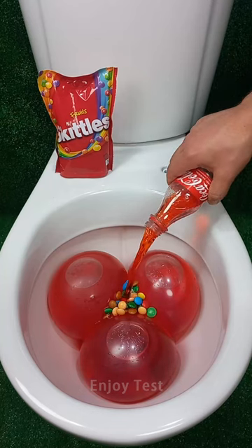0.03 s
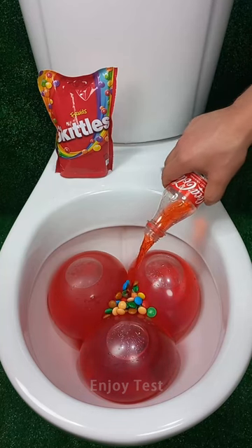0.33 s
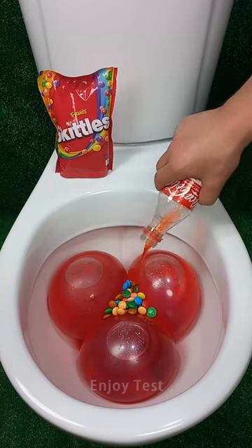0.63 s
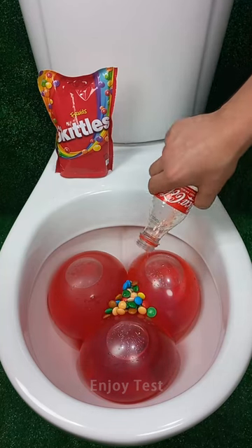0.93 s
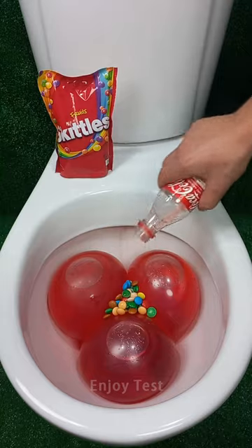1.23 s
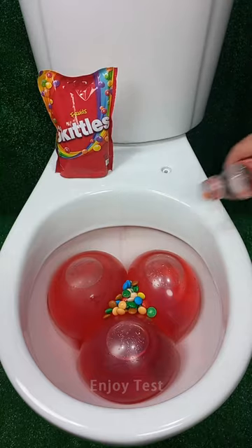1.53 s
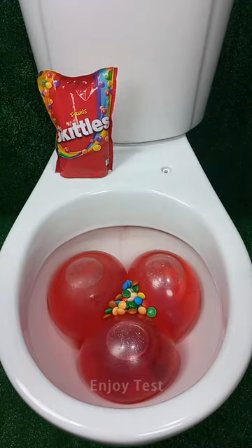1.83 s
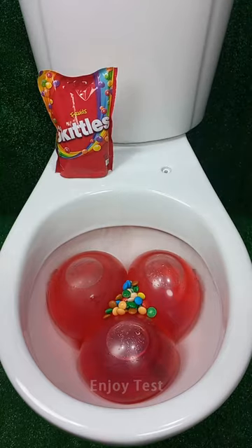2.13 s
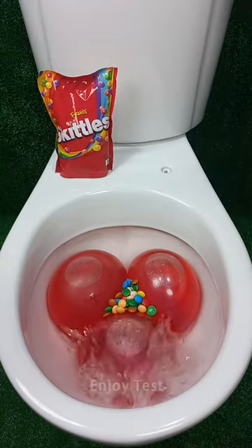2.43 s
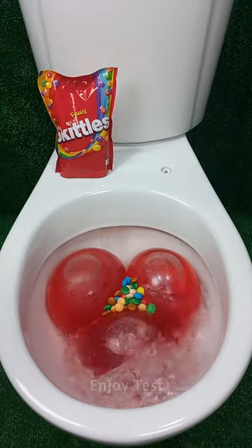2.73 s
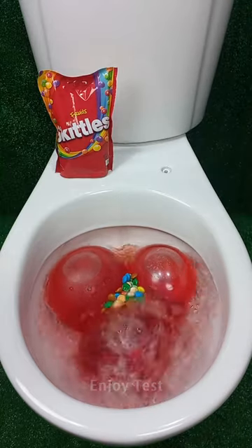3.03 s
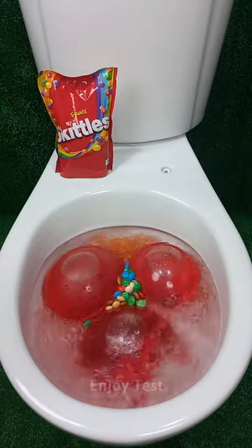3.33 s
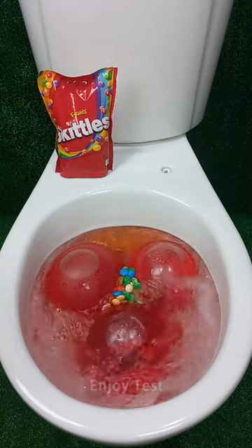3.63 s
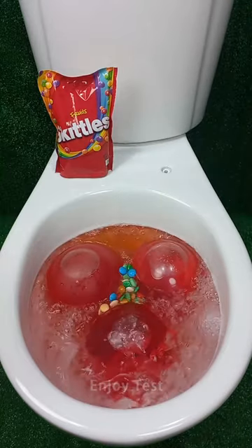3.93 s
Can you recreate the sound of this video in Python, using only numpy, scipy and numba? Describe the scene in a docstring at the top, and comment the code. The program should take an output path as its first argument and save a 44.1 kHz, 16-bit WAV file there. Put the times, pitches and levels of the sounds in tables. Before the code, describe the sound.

A toilet flushes in a small bathroom, heard close. First, foam hisses softly while the last of a fizzy drink glugs and drips into the bowl until about 0.9 seconds, and the fizz dies away. At 1.8 seconds the flush button clicks, and from 2 seconds water gurgles in over a low pipe rumble. Churning, splashing water peaks from about 2.7 to 3.2 seconds, easing slightly by 4 seconds.

```python
"""Foam hisses and dies away as the last of a fizzy drink glugs from a bottle into a toilet bowl.
The flush button clicks, the valve chatters, air gurgles out of the rim, then water rushes in with
spray and slaps over the rumble of the pipe. Most of the sound comes from bubbles: each is a damped
oscillator, its air the spring and the water around it the mass, so larger bubbles ring lower.
The porcelain bowl and a small bathroom scatter the sound of the water."""
import sys
import numpy as np
from scipy import signal
from scipy.fft import rfft, irfft
from scipy.io import wavfile
from scipy.ndimage import uniform_filter1d
from numba import njit

SR = 44100
rng = np.random.default_rng(int(sys.argv[2]) if len(sys.argv) > 2 else 0)


def unload_wav(signal):
    """Save mono or channel-first audio to the path in sys.argv[1] as 16-bit WAV at rate SR, clipped to [-1, 1]."""
    wavfile.write(
        sys.argv[1],
        SR,
        np.round(np.clip(np.atleast_2d(signal).T, -1, 1) * 32767).astype(np.int16),
    )


N = 176400
T = np.arange(N) / SR

# Levels are relative: each source adds its own gain.
# bursting foam (time [s], level [dB], offset of the coarser bubbles [dB])
FOAM_LEVELS = [(0.0, -39, -5.5), (0.782, -42.5, -10.5), (0.876, -43, -9), (1.016, -46, -11.5),
               (1.504, -53, -16.5), (1.674, -58.5, -14), (1.8, -62, -28)]
# spectrum of the foam (frequency [Hz], gain [dB])
FOAM_SPECTRUM = [(700, 0), (1100, -9.5), (1600, -8.5), (2200, -7.5), (3000, -1.5), (4000, 3), (6500, 2),
                 (9500, -2), (13000, 0.5), (15500, 0.5)]
# spectrum of the room's murmur (frequency [Hz], gain [dB])
MURMUR_SPECTRUM = [(25, -8), (50, -13), (85, 1), (130, -4.5), (300, -11), (1000, -21.5), (8000, -29)]
# glugs and last drops from the bottle (time [s], pitch [Hz], level [dB])
BOTTLE_GLUGS = [(.436, 560, -37.5), (.438, 1590, -36), (.783, 630, -38.5), (.834, 2200, -29),
                (.893, 2100, -23.5)]
# last trickles from the bottle (time [s], duration [s], pitch [Hz], level [dB])
BOTTLE_TRICKLES = [(0.394, 0.18, 582, -58.5), (0.78, .1, 720, -56), (0.83, 0.093, 2110, -50.5)]
# spectrum of running water (frequency [Hz], gain [dB])
WATER_SPECTRUM = [(200, -6.5), (330, -7), (420, 9), (600, -2.5), (850, -2.5), (1320, -2), (2200, -7),
                  (3200, -11), (5700, -17.5), (7500, -20), (9000, -22.5), (15500, -20.5)]
# knocks on the flush button and valve (time [s], level [dB])
BUTTON_KNOCKS = [(1.838, -52.5), (1.847, -43.5), (1.89, -48)]
# their modes (frequency [Hz], level [dB], time to decay by 60 dB [s])
BUTTON_MODES = [(489, 1, 0.18), (1290, -8, 0.098), (2140, -13, 0.11), (4230, -4.5, 0.043),
                (4400, -6, 0.035), (4850, 3.5, 0.027)]
# water forcing through the opening valve (time [s], level [dB])
VALVE_LEVELS = [(1.888, -51.5), (1.94, -35.5), (1.985, -26.5), (2.05, -38)]
# cavity resonances of the cistern (frequency [Hz], bandwidth [Hz], level [dB])
CISTERN_MODES = [(460, 51, -14), (700, 16, -12), (976, 54, -2), (1218, 34, -0.5), (2139, 23, -9)]
# single bubbles (time [s], pitch [Hz], level [dB], decay [cycles])
PLOP_BUBBLES = [(1.897, 977, -35, 62), (1.939, 986, -20, 18), (1.971, 1260, -19.5, 30),
                (1.987, 257.4, -19, 38), (2.043, 498, -14, 15), (2.05, 204, -20.5, 22),
                (2.089, 403, -15.5, 17), (2.115, 503, -13.5, 17), (2.156, 780, -11.5, 10),
                (2.178, 485, -14, 20), (2.193, 6570, -17, 37), (2.202, 510, -21, 31), (2.235, 800, -15, 8),
                (2.336, 543, -12, 2.9), (2.353, 1900, -20.5, 24), (2.405, 1430, -24, 16),
                (2.613, 1330, -16, 21), (2.644, 1480, -15.5, 17), (2.6642, 1115, -9.5, 15),
                (2.682, 4520, -18.5, 40), (2.843, 780, -17.5, 19), (2.875, 407, -20.5, 28),
                (3.125, 592, -16, 20.5), (3.285, 900, -17.5, 19), (3.292, 7160, -18.5, 41),
                (3.529, 1220, -15.5, 14), (3.557, 420, -22.5, 16), (3.589, 1810, -23, 23),
                (3.619, 494, -21.5, 8.8), (3.62, 1445, -17, 23), (3.727, 1670, -25, 50),
                (3.767, 1080, -21, 16), (3.887, 673, -22.5, 53), (3.912, 637, -24, 47)]
# spray in the bowl (time [s], level [dB])
SPRAY_LEVELS = [(1.91, -49.5), (2.0, -36), (2.08, -43.5), (2.275, -42), (2.29, -38.5), (2.9, -34),
                (3.25, -39), (3.35, -39.5), (3.78, -45.5), (4.0, -55.5)]
# air driven out of the rim (time [s], level [dB])
GURGLE_LEVELS = [(1.93, -45.5), (1.995, -24), (2.08, -26), (2.1, -22.5), (2.27, -34.5)]
# spectrum of that gurgle (frequency [Hz], gain [dB])
GURGLE_SPECTRUM = [(200, 17.5), (330, 4.5), (500, 0), (620, -3), (750, 2.5), (1200, -1), (1550, -6.5),
                   (2200, -8), (3200, -8)]
# long glug as the rim fills (time [s], level [dB])
RIM_GLUG_LEVELS = [(2.07, -48), (2.105, -30), (2.2, -33), (2.275, -43)]
# deep gulps under the jet (time [s], level [dB])
GULP_LEVELS = [(2.25, -45), (2.57, -60.5), (2.75, -52.5), (2.9, -40.5), (3.05, -36), (3.14, -42),
               (3.234, -59.5), (3.516, -47.5), (4.0, -64.5)]
# rumble of the pipe (time [s], level [dB])
PIPE_LEVELS = [(1.96, -85), (2.08, -40), (2.236, -57.5), (2.36, -36.5), (2.64, -67), (2.73, -45),
               (2.85, -70), (2.986, -52), (3.358, -74)]
# spectrum of that rumble (frequency [Hz], gain [dB])
PIPE_SPECTRUM = [(25, -24), (48, -15), (68, 3.5), (82, -9), (97, 5.5), (140, -9), (200, 0)]
# water slapping the porcelain (time [s], level [dB], centre [Hz], width [octaves])
WATER_SLAPS = [(2.044, -21, 5900, 2.2), (2.18, -24.5, 3850, 1.5), (2.2846, -23.5, 5340, 5.9),
               (2.399, -21.5, 5800, 1.3), (2.5538, -30.5, 7500, 2), (2.628, -25.5, 6600, 2.4),
               (2.642, -31.5, 5000, 2.3), (2.8687, -26, 3940, 1.7), (2.889, -16.5, 2600, 0.57),
               (3.054, -20.5, 2900, 0.75), (3.126, -14, 2570, 1.2), (3.15, -20, 2400, 1.8),
               (3.285, -25, 3970, 1.1), (3.507, -25, 10300, 2.3), (3.581, -24, 11000, 1.7),
               (3.659, -32, 3450, 0.74), (3.694, -29.5, 2700, 1.7), (3.73, -26, 4070, .6)]
# large churning bubbles (time [s], level [dB])
CHURN_LEVELS = [(2.28, -39.5), (2.556, -40.5), (2.73, -28), (3.15, -34), (3.21, -34), (3.57, -34),
                (3.836, -42.5), (3.894, -34), (4.0, -45)]
# their pitch, which falls when the jet digs deeper (time [s], pitch [Hz])
CHURN_PITCHES = [(2.33, 490), (2.65, 1020), (2.75, 597), (3.15, 630), (3.3, 488), (4.0, 596)]
# small splashing bubbles (time [s], level [dB])
SPLASH_LEVELS = [(2.28, -65), (2.288, -37), (2.662, -30.5), (3.18, -31), (3.204, -34), (3.87, -41.5),
                 (4.0, -53)]
# cavity resonances of the bowl (frequency [Hz], bandwidth [Hz], gain [dB])
BOWL_MODES = [(223, 11, 6), (292, 10, -0.5), (408.4, 21, 4.5), (525.4, 18, 5.5), (650, 72, -3),
              (728, 240, 4.5), (1210, 44, -1.5)]
# left-right difference of the scattered sound (frequency [Hz], gain [dB])
SIDE_SPECTRUM = [(100, -23), (250, -6.5), (500, -2.5), (1200, -2), (3000, 1), (15000, 1.5)]

BOWL_T60_S, BOWL_DB, ROOM_T60_S, ROOM_DB = 0.038, -1.5, 0.14, -3
LEFT_RIGHT = np.array([[1], [-1]])


def undb(db):
    """Amplitude grows tenfold with every 20 dB."""
    return 10 ** (np.asarray(db) / 20)


def unit(x):
    """Normalisation to rms 1."""
    return x / np.sqrt(np.mean(x ** 2) + 1e-18)


def steady(x):
    """Division by the running rms evens out slow changes of level."""
    power = uniform_filter1d(uniform_filter1d(x ** 2, SR // 8), SR // 16)
    return x / np.sqrt(np.abs(power) + 1e-18)


def envelope(rows, fade_db_per_s=500):
    """Gain along (time [s], level [dB]) rows, with exponential fades outside them."""
    t, db = np.array(rows).T[:2]
    outside_s = np.maximum(0, np.maximum(t[0] - T, T - t[-1]))
    return undb(np.interp(T, t, db) - fade_db_per_s * outside_s)


def colour(x, spectrum):
    """Zero-phase filtering by (frequency [Hz], gain [dB]) rows."""
    hz, db = np.array(spectrum).T
    f = np.fft.rfftfreq(x.shape[-1], 1 / SR) + 1
    return irfft(rfft(x) * undb(np.interp(np.log(f), np.log(hz), db)), x.shape[-1])


def band(x, lo_hz, hi_hz, order=3):
    """Maximally flat band-pass filtering."""
    edges_hz = [lo_hz, min(hi_hz, SR / 2 - 1000)]
    return signal.sosfilt(signal.butter(order, edges_hz, "band", fs=SR, output="sos"), x + 1e-18)


def flutter(lo_hz, hi_hz, order=3):
    """Band-limited noise of rms 1, for random amplitude modulation."""
    return unit(band(rng.standard_normal(N), lo_hz, hi_hz, order))


@njit
def damped_sines(times, hz, cycles, amplitude, glide, attack_cycles):
    """Damped oscillation: each sine falls 60 dB over `cycles` while rising by the fraction `glide`."""
    out = np.zeros(N)
    for k in range(len(times)):
        start, n = int(times[k] * SR), int(cycles[k] * SR / hz[k]) + 2
        turns, attack = 0., attack_cycles[k]
        gain, decay = amplitude[k], np.exp(-np.log(1000) / n)
        for i in range(max(0, min(n + int(attack * SR / hz[k]), N - start))):
            turns += hz[k] * (1 + glide * i / n) / SR
            if turns > attack / 2:
                gain *= decay
            rise = np.sin(np.pi / 2 * turns / attack) ** 2 if turns < attack else 1.
            out[start + i] += gain * rise * np.sin(2 * np.pi * turns)
    return out


def ring(times, hz, cycles, amplitude, glide):
    """Free vibration of bubbles or modes: short rings build within a cycle, long ones more slowly."""
    cycles = cycles * np.ones(len(hz))
    attack_cycles = np.maximum(0.74, .06 * cycles)
    return damped_sines(times, hz, cycles, amplitude, float(glide), attack_cycles)


def bubbles(lo_hz, hi_hz, per_s, cycles, spread_db, glide, spectrum=WATER_SPECTRUM):
    """Superposition of randomly timed resonances gives a steady swarm of rms 1."""
    when, pitch, length, strength = rng.random((int(per_s * N / SR), 4)).T
    hz = lo_hz * (min(hi_hz, SR / 2 - 2000) / lo_hz) ** pitch
    amplitude = hz * undb(-spread_db * np.log(1 - .985 * strength))  # many weak, a few strong
    swarm = ring(when * N / SR, hz, cycles * 2 ** (2 * length - 1), amplitude, glide)
    return steady(colour(band(swarm, lo_hz, hi_hz, order=2), spectrum))


def bowl(x):
    """Cavity resonance: the bowl lifts some narrow bands and weakens others."""
    return x + sum((undb(db) - 1) * signal.lfilter(*signal.iirpeak(hz, hz / width, SR), x)
                   for hz, width, db in BOWL_MODES)


def bathroom(x, scatter_db=0):
    """Reverberation: direct sound from one spot, quick bowl reflections and the room's tail, in stereo."""
    t = T[:SR // 3]
    bowl_tail, room_tail = (
        rng.standard_normal((2, len(t))) * undb(db - 60 * t / t60) * np.sqrt(2 * np.log(1000) / (t60 * SR))
        for t60, db in ((BOWL_T60_S, BOWL_DB), (ROOM_T60_S, ROOM_DB)))
    mid, side = undb(scatter_db) * (bowl_tail + room_tail)
    impulse = np.eye(1, len(t), k=16)[0]
    mid = mid + colour(impulse, [(300, 4), (1500, 1), (5000, -2), (12000, -3)])
    paths = mid + colour(side, SIDE_SPECTRUM) * LEFT_RIGHT
    smooth_gain = np.sqrt(uniform_filter1d(np.abs(rfft(mid)) ** 2, len(t) // 200))
    paths = irfft(rfft(paths) / smooth_gain, len(t))  # flat overall, with fine ripple
    return signal.fftconvolve(x[None], paths[:, :len(t) * 3 // 4], axes=1)[:, :N]


def foam(fine_db=1.0, coarse_db=2, right_db=1.0):
    """Countless tiny bursting bubbles add incoherently to a hiss; the coarser ones run out first."""
    t, db, coarse_offset_db = np.array(FOAM_LEVELS).T
    fine = np.array([bubbles(3490, 16500, 9000, 6.0, 0.44, 0.065, FOAM_SPECTRUM) for _ in range(2)])
    coarse = np.array([bubbles(876, 3640, 3000, 5.2, 0.63, 0.13, FOAM_SPECTRUM) for _ in range(2)])
    fine *= undb(fine_db) * envelope(FOAM_LEVELS, fade_db_per_s=48)
    coarse *= undb(coarse_db) * envelope(np.c_[t, db + coarse_offset_db], fade_db_per_s=60)
    return np.sqrt(2) * (fine + coarse) * undb(-right_db / 2 * LEFT_RIGHT)


def murmur(level_db=-58, side_db=-6, fade_db_per_s=4):
    """Ambient noise of the room, mostly low in frequency, slowly grows fainter."""
    mid, side = unit(colour(rng.standard_normal((2, N)), MURMUR_SPECTRUM))
    return undb(level_db - fade_db_per_s * T) * (mid + undb(side_db) * side * LEFT_RIGHT)


def bottle(stream_db=-55, thin_db_per_s=12):
    """Air entrainment: the thinning stream burbles, air glugs into the neck and the last drops fall."""
    t, hz, db = np.array(BOTTLE_GLUGS).T.copy()
    glugs = ring(t, hz, cycles=30, amplitude=undb(db), glide=0.063)
    stream = bubbles(150, 1430, 500, 9.2, 2.7, 0.2, [(220, -7), (350, -3.5), (750, -11), (1100, -7)])
    return glugs + bowl(stream * undb(stream_db - thin_db_per_s * T))


def trickle(pitch_ratio=1.2):
    """The last spurts break into bubbles of like size, which resonate in a narrow band."""
    return sum(bubbles(hz / pitch_ratio, hz * pitch_ratio, per_s=450, cycles=9.9, spread_db=2, glide=.08)
               * envelope([(t, db), (t + length, db)]) for t, length, hz, db in BOTTLE_TRICKLES)


def button(rattle_depth=0.82):
    """Light impacts excite the modes of the button and valve, which rattle loosely."""
    hz, db, t60 = np.array(BUTTON_MODES).T.copy()
    knocks = sum(ring(np.full(len(hz), t), hz, hz * t60, undb(db + knock_db), glide=0)
                 for t, knock_db in BUTTON_KNOCKS)
    return knocks + rattle_depth * band(knocks, 3500, 5300) * flutter(50, 330)


def valve(rough_db=4):
    """Forced resonance: water chatters through the opening valve and drives the hollow cistern."""
    chatter = rng.standard_normal(N) * undb(rough_db * flutter(20, 99))
    cistern = sum(undb(db) * unit(signal.lfilter(*signal.iirpeak(hz, hz / width, SR), chatter))
                  for hz, width, db in CISTERN_MODES)
    return steady(band(cistern, 340, 1800)) * envelope(VALVE_LEVELS)


def plops():
    """Bubble resonance: single pockets of air ring and rise in pitch."""
    t, hz, db, cycles = np.array(PLOP_BUBBLES).T.copy()
    return band(ring(t, hz, cycles, undb(db), glide=0.053), 180, SR / 2)


def spray(drops_db=-7, mist_db=-3.0, ping_db=-9, flutter_db=1.1):
    """Droplet impacts patter on the porcelain in uneven spurts and ping in the water, over a fine mist."""
    spurts = undb(flutter_db * flutter(5.4, 63, order=1)) * envelope(SPRAY_LEVELS)
    drops = sum(bathroom(bubbles(3670, 15300, 700, 6.7, 2.5, 0.12) * spurts, scatter_db=-3)
                for _ in range(2))
    pings = bathroom(bubbles(2990, 7330, per_s=140, cycles=80, spread_db=3.7, glide=0.11) * spurts)
    mist = unit(colour(band(rng.standard_normal((2, N)), 2850, 19700), WATER_SPECTRUM))
    return undb(drops_db) * drops + undb(ping_db) * pings + undb(mist_db) * mist * spurts


def gurgle(air_db=-5, glug_db=-4, gulp_db=-2):
    """Displaced air rings as bubbles: the rim gurgles, glugs as it fills, and the jet gulps below."""
    air = bubbles(319.5, 2580, 900, 15.5, 1.74, 0.21, GURGLE_SPECTRUM) * envelope(GURGLE_LEVELS)
    glug = bubbles(349, 595, 260, 25, 1.2, 0.093) * envelope(RIM_GLUG_LEVELS)
    gulps = bubbles(195.4, 362, 450, 12, 2, 0.072) * envelope(GULP_LEVELS)
    return bowl(undb(air_db) * air + undb(glug_db) * glug + undb(gulp_db) * gulps)


def pipe(rumble_db=-3):
    """Structure-borne sound: the falling water shakes the pipe and the bowl."""
    return bubbles(58.0, 155, 150, 13, 1.5, .03, PIPE_SPECTRUM) * envelope(PIPE_LEVELS) * undb(rumble_db)


def slaps(grain_db=5, attack_s=0.00073, decay_s=0.0031):
    """Impact noise: each slap on the porcelain is a short crackling burst of droplets."""
    out, t = np.zeros(N + SR), T[:SR // 10]
    f = np.fft.rfftfreq(len(t), 1 / SR) + 1
    burst = np.minimum(t / attack_s, 1) * np.exp(-t / decay_s)
    for start, db, hz, octaves in WATER_SLAPS:
        noise, size = rng.standard_normal((2, len(t)))
        rolloff = (1 + (np.log2(f / hz) / octaves * 2) ** 2) ** 0.86
        drops = irfft(rfft(noise * undb(grain_db * size)) / rolloff, len(t))
        i = int(start * SR)
        out[i:i + len(t)] += undb(db) * unit(drops) * burst
    return band(out[:N], 900, 18000, order=2)


def churning(per_s=220, cycles=17, octaves=0.628, spread_db=6):
    """Large bubbles resonate at a pitch set by their size, which follows the depth of the jet."""
    when, pitch, length, strength = rng.random((int(per_s * N / SR), 4)).T
    t = when * N / SR
    hz = np.interp(t, *np.array(CHURN_PITCHES).T) * 2 ** (octaves * (2 * pitch - 1))
    swarm = ring(t, hz, cycles * 2 ** (2 * length - 1), undb(spread_db * strength), glide=0.093)
    return steady(band(swarm, 324, 1620)) * envelope(CHURN_LEVELS)


def rush(churn_db=-3, splash_db=-4, drip_db=-7, slosh_db=0.7):
    """Inrushing water entrains air at several spots; sloshing modulates the churn and the splash."""
    slosh = undb(slosh_db * flutter(7.1, 17.5, order=2))
    splashing = envelope(SPLASH_LEVELS)
    churn = sum(bathroom(bowl(churning() * slosh)) for _ in range(2)) / np.sqrt(2)
    splash = sum(bathroom(bubbles(805, 3870, 600, 6.8, 4.6, 0.2) * splashing * slosh, scatter_db=-0.5)
                 for _ in range(2))
    drips = bubbles(852, 3000, per_s=70, cycles=40, spread_db=2, glide=0.17) * splashing
    return undb(churn_db) * churn + undb(splash_db) * splash + undb(drip_db) * bathroom(bowl(drips))


def scene(left_db=0.6):
    """Superposition of all sources, with the water a little to the left."""
    water = bathroom(bottle() + trickle() + button())
    water += bathroom(valve(), scatter_db=-7)
    water += spray() + bathroom(gurgle()) + rush()
    # plops and slaps are at the open surface and scatter less
    water += bathroom(plops(), scatter_db=-2.5) + bathroom(slaps(), scatter_db=-1)
    return foam() + murmur() + water * undb(left_db / 2 * LEFT_RIGHT) + pipe()


def record(dry, cutoff_hz=15900):
    """Elliptic low-pass filtering removes the highest treble."""
    return signal.sosfilt(signal.ellip(10, .2, 70, cutoff_hz, fs=SR, output="sos"), dry)


dry = scene()
out = record(dry)
unload_wav(out)
```